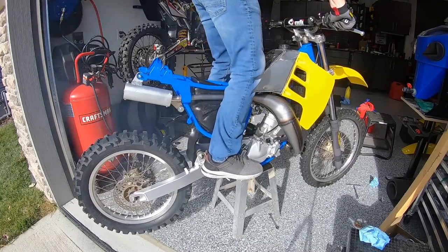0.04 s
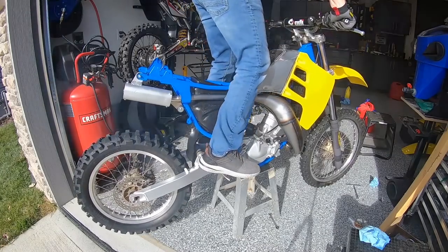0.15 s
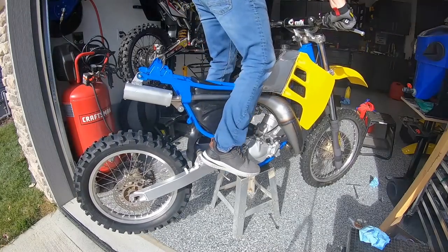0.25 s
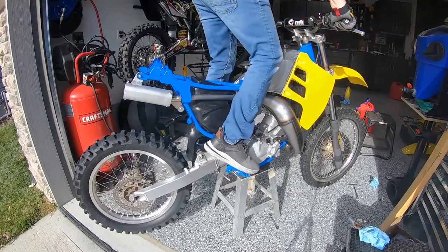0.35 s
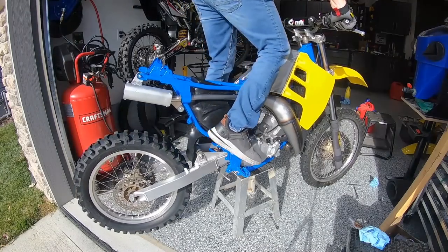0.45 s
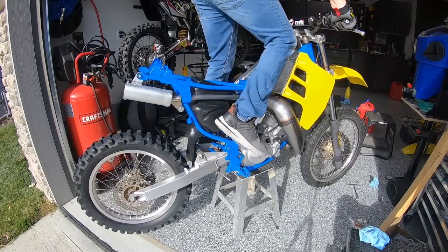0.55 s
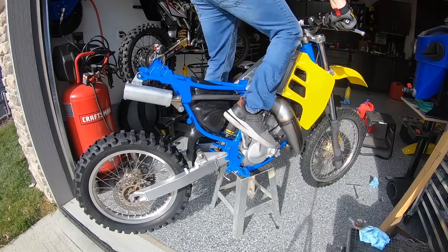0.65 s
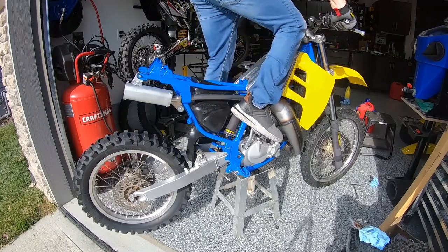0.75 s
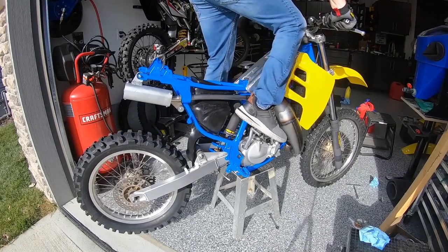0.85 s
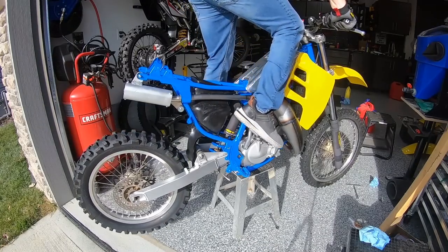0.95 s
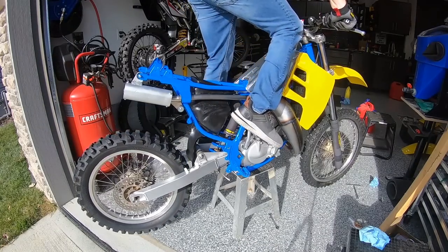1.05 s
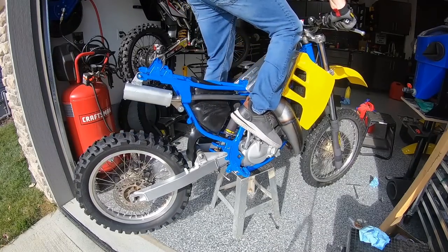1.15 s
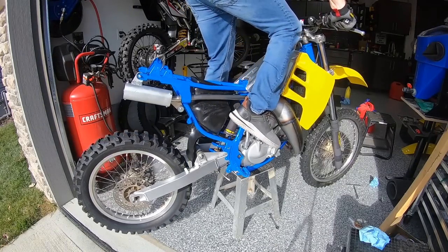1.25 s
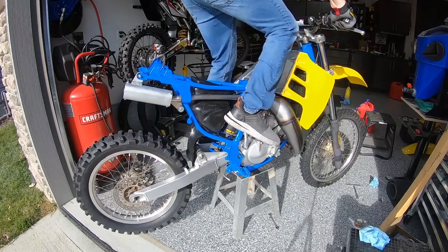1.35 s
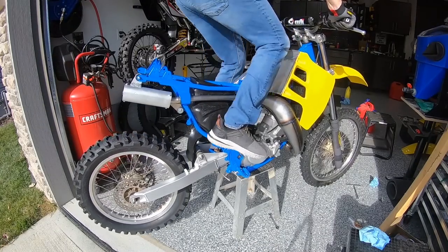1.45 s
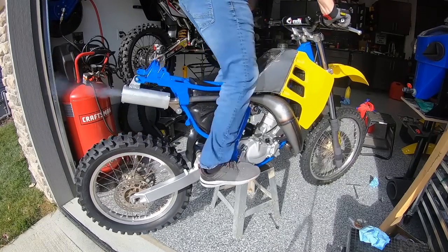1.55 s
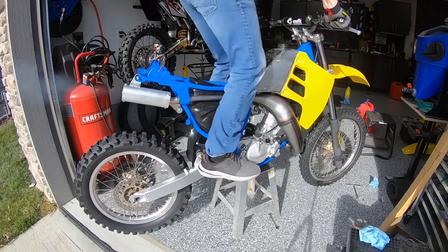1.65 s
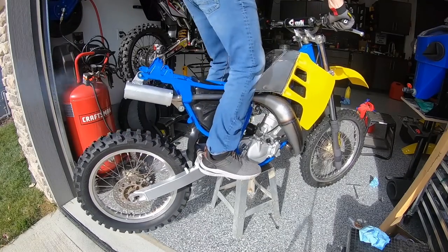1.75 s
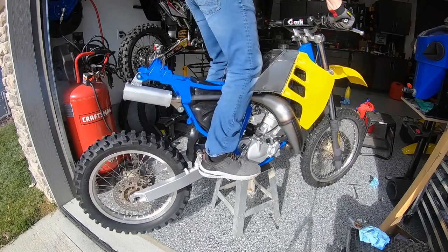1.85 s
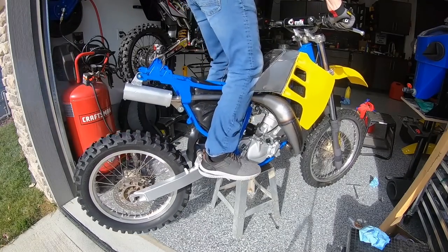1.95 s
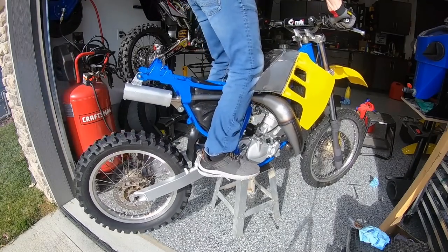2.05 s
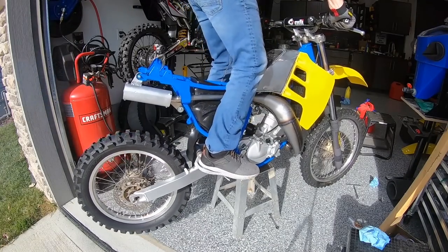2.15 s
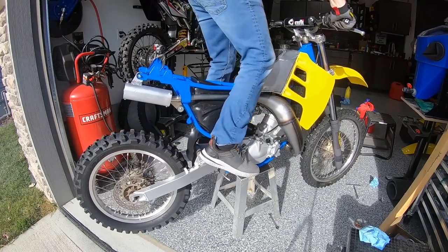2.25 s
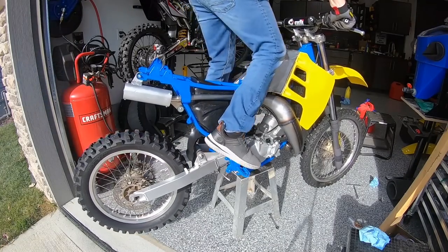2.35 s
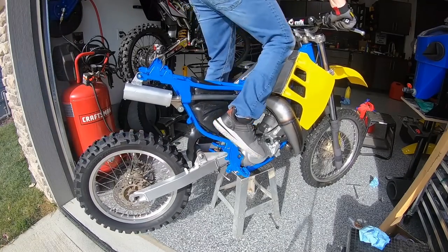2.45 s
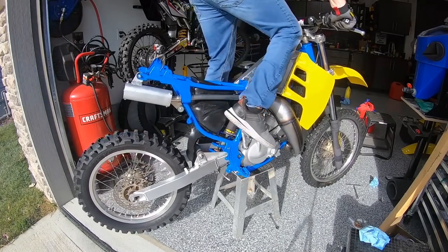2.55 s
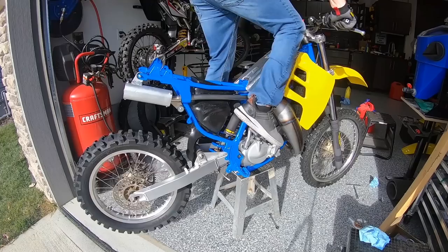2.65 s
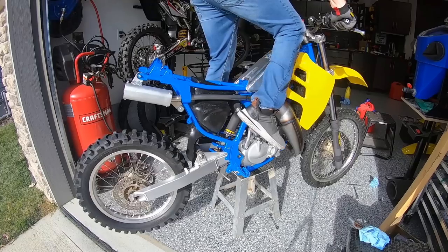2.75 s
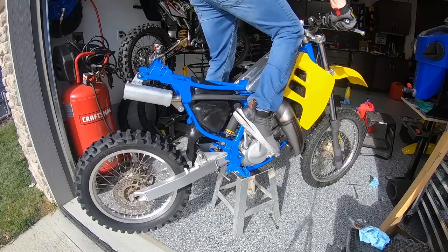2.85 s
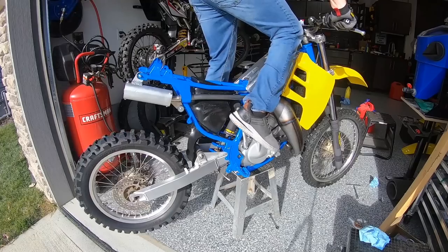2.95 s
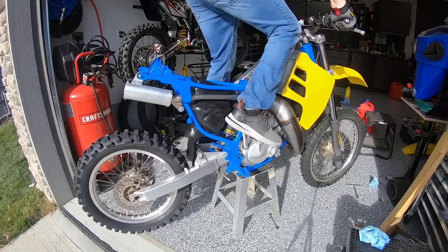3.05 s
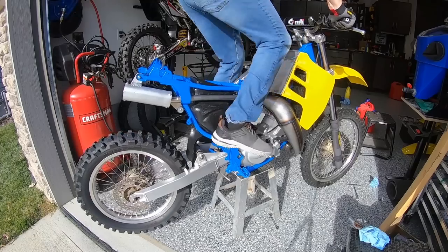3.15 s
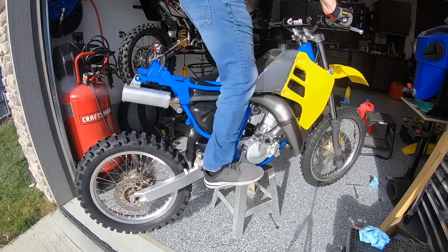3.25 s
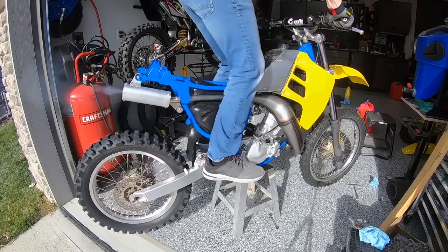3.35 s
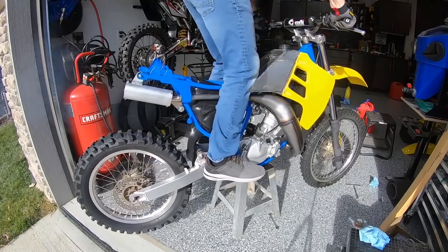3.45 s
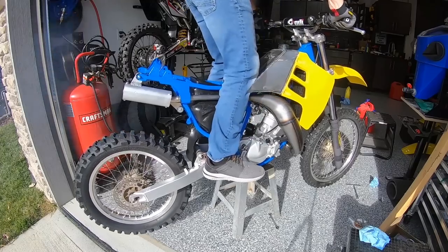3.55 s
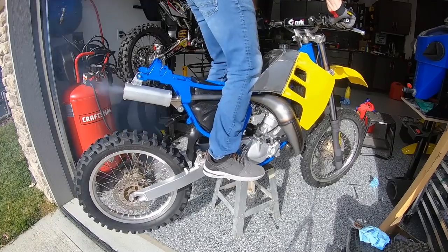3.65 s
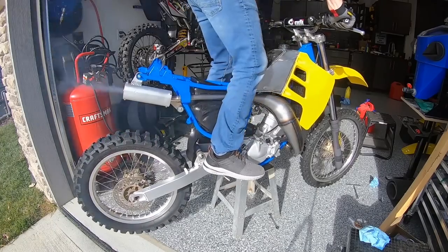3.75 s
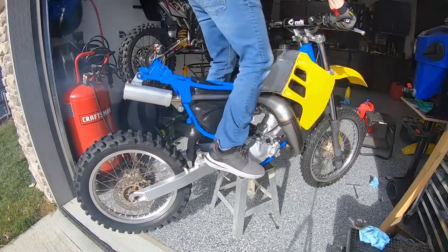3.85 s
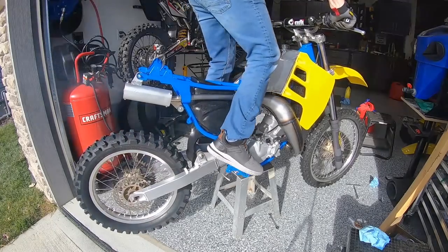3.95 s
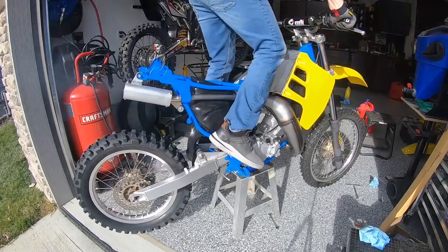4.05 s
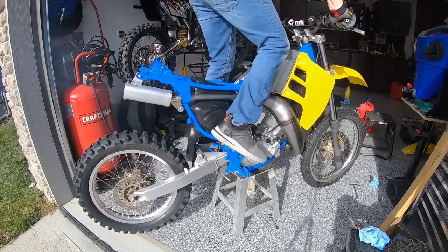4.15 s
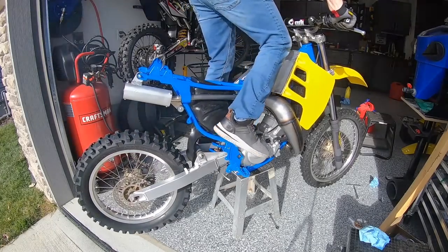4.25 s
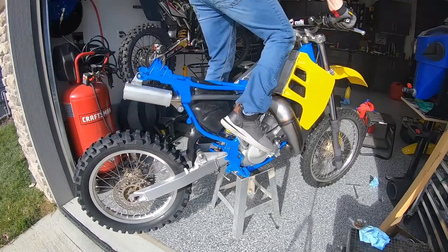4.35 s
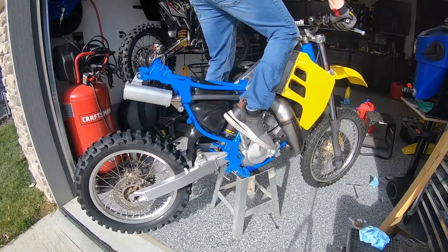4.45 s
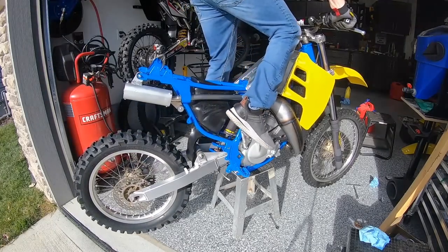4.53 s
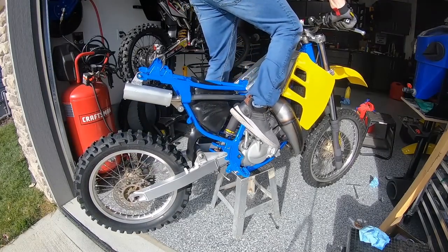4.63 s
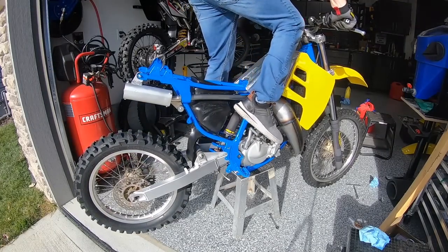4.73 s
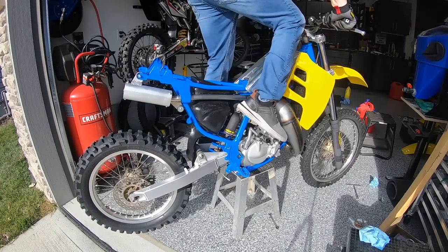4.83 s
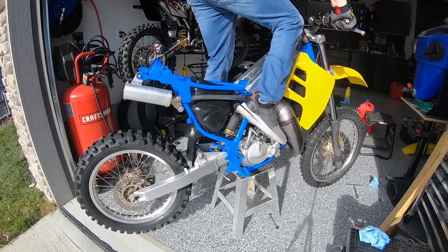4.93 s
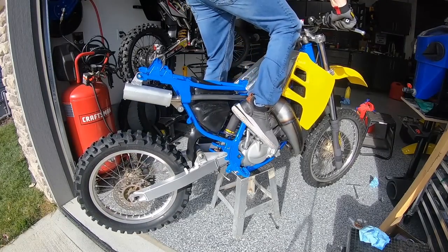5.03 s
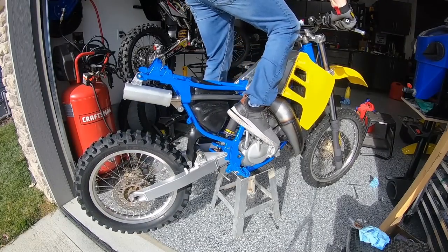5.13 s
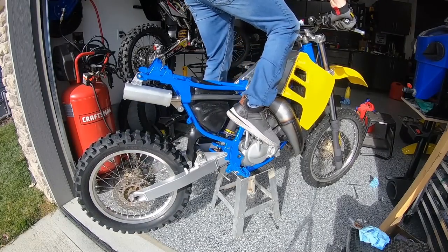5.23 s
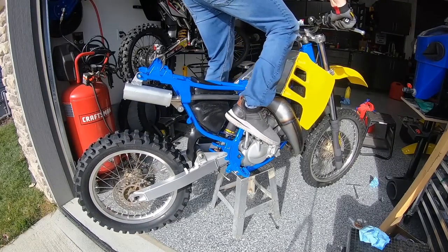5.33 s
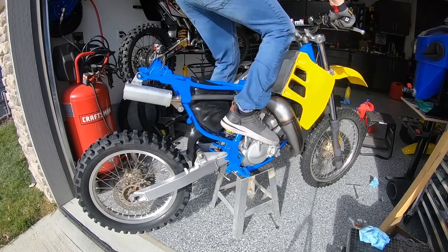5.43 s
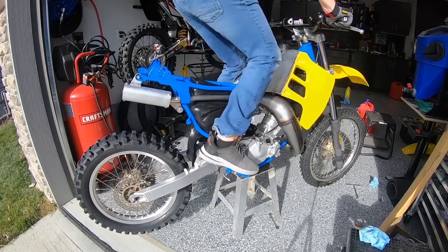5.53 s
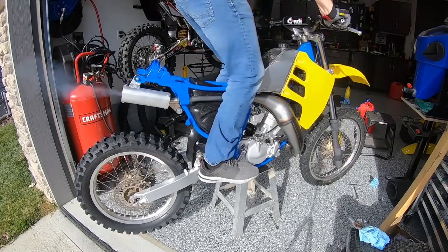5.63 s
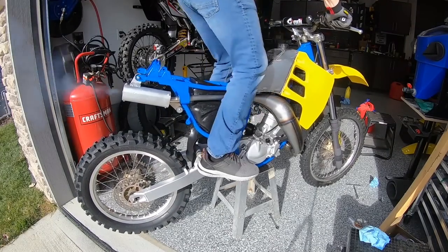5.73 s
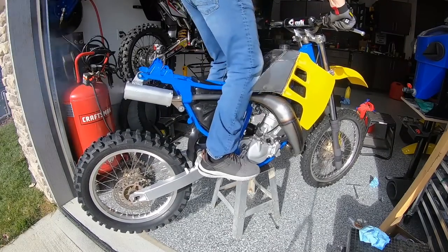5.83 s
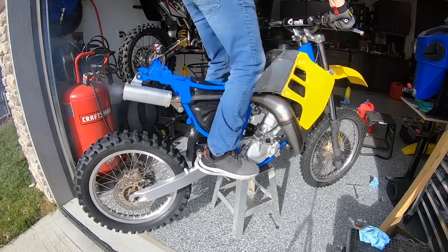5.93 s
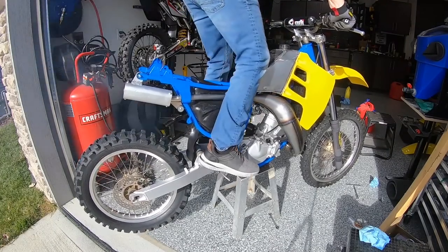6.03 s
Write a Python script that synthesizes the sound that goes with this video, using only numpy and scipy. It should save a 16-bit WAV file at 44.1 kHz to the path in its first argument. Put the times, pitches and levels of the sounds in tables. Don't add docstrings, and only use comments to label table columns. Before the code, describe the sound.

Kick-starting a reluctant dirt bike engine. Sharp ratchet clicks and fine ticks alternate with sudden bursts of loud, dull exhaust thumps, knocking metal and gear hiss. The first full attempt fades quickly, the next stumbles on for about a second, and the last is cut off while still turning. Faint pipe ringing fills the pauses. Heard close by at an open garage, with wind rumbling in the microphone.

```python
import sys
import numpy as np
from scipy import signal
from scipy.fft import rfft, irfft, next_fast_len
from scipy.io import wavfile
from scipy.ndimage import uniform_filter1d, map_coordinates

SR = 44100
rng = np.random.default_rng(int(sys.argv[2]) if len(sys.argv) > 2 else 0)


def voltage_ratio(decibels):
    exponent = np.asarray(decibels, float) / 20
    return 10 ** exponent


def output_pcm(signal):
    pcm = np.clip(np.atleast_2d(signal).T, -1, 1) * 32767
    wavfile.write(sys.argv[1], SR, np.round(pcm).astype(np.int16))


N = 268480

# start_s, buffet_db, left_minus_right_db
GUSTS = [(0, -29, 2), (.1, -33.5, 3.5), (1.49, -30.5, 0.5), (1.59, -29, -0.5), (2.31, -39, 5.5),
         (3.05, -36, 2), (3.29, -33.5, 5), (3.6, -32.5, 2), (4.4, -31, 10), (4.7, -33.5, 3),
         (4.9, -28.5, 3.5), (5.09, -40, 9), (5.13, -24, 6), (5.3, -26.5, 8.5), (5.6, -33, 18.5),
         (5.72, -25, 1), (6.0, -40.5, 8), (6.09, -27, -1)]
# freq_hz, density_db
RUMBLE_SPECTRUM = [(8.8, -44), (15, 22.5), (27, 4.5), (59, 4.5), (124, -3.5), (226, -16), (282, -24),
                   (341, -31.5), (500, -38), (650, -70), (1100, -120)]
# freq_hz, density_db
AIR_SPECTRUM = [(88, -31), (150, -13.5), (213, 2), (346, -1), (412, -8), (782, -11.5), (861, -16.5),
                (1270, -15), (2610, -29.5), (7160, -34), (15600, -44)]
# freq_hz, likeness [0-1]
PORT_LIKENESS = [(200, 1), (500, 0.99), (1000, 0.68), (2000, 0.72), (4000, 0.85), (8000, 0.34),
                 (12000, 0.13)]
# freq_hz, t60_s
GARAGE_DECAY = [(200, 0.42), (2000, 0.7), (6000, 0.4), (12000, 0.34)]
# peak_s, pitch_hz, peak_db, swell_db_per_s, fade_db_per_s
PIPE_TONES = [
    (.62, 1270, -57, 11, 144),
    (.75, 1300, -56.5, 150, 14),
    (2.95, 1302, -51, 36, 36),
    (4.75, 1310, -60, 55, 27),
    (2.1, 2030, -58, 100, 15),
    (4.2, 1963, -52, 103, 32),
]
# start_s, pitch_hz, level_db, t60_s, width_hz
LOOSE_PARTS = [
    (.004, 1480, -27, .15, 120),
    (1.572, 10600, -38, .1, 500),
    (3.26, 2950, -33, .25, 120),
    (3.295, 10500, -42, .1, 500),
    (2.365, 2250, -47, .1, 150),
    (4.36, 3060, -52, .8, 200),
    (4.79, 1980, -50, .4, 30),
    (5.147, 2050, -48, .15, 80),
]
# start_s, peak_db, lever_ring_db, spring_ring_db
RATCHET_CLICKS = [(0.4285, -32.5, -60, -46), (0.475, -24, -37, -48), (0.515, -34, -31, -36),
                  (0.5866, -23, -27, -30), (0.7006, -19.5, -37, -38), (0.813, -22.5, -22, -16),
                  (1.3478, -45, -50, -19.5), (2.408, -24, -28, -50), (2.4952, -23, -21.5, -53),
                  (2.5811, -22.5, -20, -52), (2.677, -22, -48, -43), (2.804, -33.5, -67.5, -27),
                  (4.7845, -24, -35, -21), (5.0245, -36, -60, -62), (5.1465, -40, -52, -38)]
# freq_hz, width_hz, level_db
LEVER_MODES = [(3705, 110, 0)]
# freq_hz, width_hz, level_db
SPRING_MODES = [(5780, 420, 11), (6800, 870, 10)]
# start_s, peak_db, edge_db
PAWL_TICKS = [(0.034, -17.5, -10.5), (0.0657, -20.5, -4.5), (0.102, -17, -14), (1.3477, -36.5, 4),
              (1.401, -30, -8), (2.0134, -34.5, 3), (2.1, -35.5, 1), (2.138, -39, -2), (4.7312, -31, -31),
              (4.7717, -40, -20), (4.889, -44, -23), (5.389, -54.5, -4), (1.092, -56, -2), (1.169, -51, -8),
              (5.144, -39, 1), (2.0442, -13.5, -20), (2.2116, -36.5, -3), (2.238, -26.5, -15.5),
              (2.273, -33, -5.5), (2.309, -30, -10), (3.0714, -45.5, -4.5), (3.1437, -36, -19),
              (4.254, -37.5, 4), (4.397, -46, 5.5), (4.458, -33, -9.5), (4.479, -30.5, -15),
              (4.508, -38, -1), (4.5364, -31, -10.5), (4.58, -32.5, -10), (4.6224, -32, -12),
              (4.676, -36.5, -26)]
# start_s, peak_db, edge_db
DULL_KNOCKS = [(1.0118, -43, -23), (1.031, -38.5, -33), (1.506, -37, -14), (1.535, -25, -15),
               (1.5714, -18, -25), (1.675, -39, -21), (3.256, -27, -20), (3.306, -20.5, -23),
               (3.723, -20.5, -13), (3.825, -16.5, -13), (4.001, -30, -21), (4.16, -33, -17),
               (5.519, -43.5, -27), (5.566, -43, -25), (1.6306, -15.5, -15), (1.703, -15.5, -16),
               (1.792, -16.5, -17), (2.9145, -43, -33), (2.947, -37.5, -45), (3.1875, -39, -25),
               (3.222, -34, -16), (3.3258, -18.5, -4.5), (3.3776, -15.5, -14.5), (3.444, -15.5, -12),
               (3.917, -19.5, -9.5), (4.068, -17, -9), (4.222, -23, -25), (4.287, -25, -7.5),
               (5.118, -41, -35), (5.459, -43.5, -18), (5.503, -41, -10), (5.5553, -51, -28),
               (5.594, -34, -20), (5.6064, -30, -10), (5.622, -25.5, -16), (5.669, -13, -15.5),
               (5.731, -18.5, -9), (5.7838, -19, -30), (5.828, -17, -25), (6.048, -21.5, -26)]
# start_s, peak_db
SKIPPED_TEETH = [(1.6681, -30), (1.8074, -16), (1.8544, -29), (1.8737, -30), (1.8934, -24), (1.9174, -30),
                 (1.936, -20), (1.959, -22.5), (1.9834, -25), (2.0847, -27), (2.117, -28), (2.161, -33),
                 (2.1859, -31), (3.4254, -29), (3.503, -18), (3.5324, -22), (3.5524, -24), (3.5793, -19),
                 (3.601, -35), (3.6164, -18), (3.6366, -24), (3.6554, -28), (3.6785, -24), (3.6974, -36),
                 (3.7209, -34), (3.7633, -24), (3.7878, -27), (3.8114, -21), (3.8741, -37), (3.896, -30),
                 (3.957, -26), (3.9964, -23), (4.0178, -24), (4.0394, -24), (4.118, -22.5), (4.1405, -30),
                 (4.1644, -32), (4.1889, -26), (4.2163, -26), (4.3344, -43), (4.3534, -48), (4.372, -40),
                 (4.4149, -31), (4.4337, -35), (5.5822, -48), (5.656, -38), (5.7877, -25), (5.883, -27.5),
                 (5.9024, -25), (5.988, -22), (6.0107, -28)]
# freq_hz, density_db
SNAP_SPECTRUM = [(290, -17), (500, 7), (1310, -4), (1650, -6.5), (1800, -6), (2400, -10.5), (3750, -7.5),
                 (3970, -7), (9410, -8), (11200, -22), (15600, -23)]
# start_s, case_clatter_db
SPINS = [
    [(0, -28.5), (.13, -42), (.22, -52.5), (.4, -69.5)],
    [(1.45, -53.5), (1.53, -38), (1.58, -33), (1.72, -31.5), (1.87, -31), (2.0, -34.5), (2.1, -45),
     (2.23, -50), (2.45, -71.5)],
    [(3.1, -67.5), (3.19, -54.5), (3.26, -33), (3.42, -33), (3.52, -30.5), (3.96, -33.5), (4.13, -34),
     (4.32, -42), (4.75, -76.5)],
    [(5.45, -68.5), (5.55, -50.5), (5.62, -34.5), (5.655, -34), (5.69, -34), (5.8, -33), (5.87, -32.5),
     (5.95, -26), (6.09, -30)],
]
COAST_LOSS = [4.3, 1.06, 0.99, 0.85]
# freq_hz, width_hz, level_db
EXHAUST_MODES = [(152, 66, -6), (220, 51, -1.5), (261, 14, 3.5), (320, 57, -14), (421, 220, -14),
                 (529.7, 63, -7), (794, 15, -26)]
# freq_hz, width_hz, level_db
CASE_MODES = [(680, 39, -13), (1044, 36, 9.5), (1355, 44, 5.5), (1960, 53, 7.5), (2560, 8.1, 1.5),
              (3010, 61, 5), (3680, 32, 2), (3915, 140, 4)]
# freq_hz, density_db
CLATTER_SPECTRUM = [(210, -22), (350, 1.5), (437, -6), (528, -28), (584, -6), (1330, -14), (1500, -14.5),
                    (3060, -9.5), (5000, -21.5), (6500, -24), (11000, -120)]
# freq_hz, density_db
HISS_SPECTRUM = [(2350, -24.5), (4000, -8.5), (4560, -6), (5990, -8.5), (6980, -4), (9120, -8),
                 (11600, -24), (14500, -30), (15600, -44)]
# start_s, thump_peak_db, pipe_pitch_hz
KICKED_POPS = [(1.298, -30, 248.4), (1.34, -30, 246.5), (1.374, -34, 244), (1.411, -33.5, 258),
               (1.563, -4, 244), (1.587, -10.5, 247.4), (1.601, -2.5, 261), (1.64, -1.5, 231.4),
               (1.676, -5, 260.3), (1.714, -5, 270.5), (3.255, -35, 288), (3.275, -2.5, 251.3),
               (3.316, 0, 227.4), (3.352, -4, 226), (3.388, -3, 247.5), (3.417, -24, 254),
               (3.444, -9.5, 270.6), (5.626, -8.5, 229), (5.643, -4, 261), (5.68, -2.5, 261),
               (5.706, -2.5, 246.4), (5.737, -5, 268), (5.764, -4.5, 239.3), (5.787, -15, 259),
               (5.806, -10.5, 266)]
# start_s, thump_peak_db, pipe_pitch_hz
CAUGHT_FIRINGS = [(0.01, -23, 250), (0.067, -41, 240), (0.163, -25.5, 232), (1.804, -13, 254.4),
                  (1.919, -35, 230), (1.971, -24, 225), (2.027, -15.5, 248.7), (2.128, -14.5, 241.5),
                  (3.528, -49, 257), (3.693, -18, 250), (3.737, -8.5, 261.5), (3.781, -12.5, 235),
                  (3.828, -7.5, 259), (3.878, -11.5, 254.5), (3.923, -10.5, 270), (3.97, -14, 265.7),
                  (4.015, -14, 240), (4.07, -11, 261), (4.122, -15.5, 234.5), (4.18, -17.5, 279),
                  (4.253, -16, 246.5), (4.353, -15.5, 246), (5.848, -14.5, 292.4), (5.877, -20, 250),
                  (5.914, -24, 264), (5.954, -14, 293.4), (5.995, -32, 276), (6.045, -11.5, 229)]

TOOTH_ATTACK_S, TOOTH_T60_S = 0.0015, 0.075


def unit(x):
    return x / np.sqrt(np.mean(x ** 2) + 1e-20)


def along(points, hz):
    f, v = np.transpose(points)
    return np.interp(np.log(hz + 1), np.log(f + 1), v)


def curves(rows, silent=None):
    s, *columns = np.transpose(rows)
    return np.array([np.interp(np.arange(N) / SR, s, c, silent, silent) for c in columns])


def wobble(rate):
    knots = rng.standard_normal(int(N * rate / SR) + 4)
    return map_coordinates(knots, [np.arange(N) * rate / SR])


def filtered(x, response):
    m = next_fast_len(N + SR // 2)
    return irfft(rfft(x, m) * response(np.fft.rfftfreq(m, 1 / SR)), m)[..., :N]


def modes(table):
    def response(f):
        return sum((-1) ** k * voltage_ratio(db) * 1j * f * width / (hz * hz - f * f + 1j * f * width)
                   for k, (hz, width, db) in enumerate(table))
    return response


def twice_through(x, table):
    return unit(filtered(filtered(x, modes(table)), modes(table)))


def coloured(spectrum, channels=1):
    return unit(filtered(rng.standard_normal((channels, N)), lambda hz: voltage_ratio(along(spectrum, hz))))


def bursts(times, levels_db, attack, t60):
    strikes, t = np.zeros(N), np.arange(SR // 2) / SR
    np.add.at(strikes, np.round(np.asarray(times) * SR).astype(int), voltage_ratio(levels_db))
    return signal.fftconvolve(strikes, (1 - np.exp(-t / attack)) * voltage_ratio(-60 * t / t60))[:N]


def patchy(x, depth_db):
    z = signal.stft(x, nperseg=256)[2]
    field = uniform_filter1d(rng.standard_normal(z.shape), size=3, axis=0)
    field = uniform_filter1d(field, size=10, axis=1)
    return signal.istft(z * voltage_ratio(depth_db * unit(field)), nperseg=256)[1][:N]


def spread(x):
    def turn(hz):
        return np.arccos(np.clip(along(PORT_LIKENESS, hz), -1, 1)) / 2
    z = signal.stft(x, nperseg=256)[2]
    paths = uniform_filter1d(rng.standard_normal((2, *z.shape)), size=3, axis=1)
    paths = uniform_filter1d(paths, size=5, axis=2)
    other = signal.istft(z * np.exp(1j * np.arctan2(*paths)), nperseg=256)[1][:N]
    mid = filtered(x, lambda f: np.cos(turn(f)))
    side = voltage_ratio(3.5) * filtered(other, lambda f: np.sin(turn(f)))
    return np.array([mid + side, mid - side]) * voltage_ratio([[-0.3], [0.3]])


def wind():
    buffet_db, pan_db = curves(GUSTS)
    bright_db = np.minimum(-15.5 + 7.5 * pan_db, 10.5)
    flutter_db = 2.0 * np.array([wobble(16), wobble(6.4)])
    shared, split = coloured(RUMBLE_SPECTRUM, channels=2) * voltage_ratio(flutter_db)
    ports = unit(np.array([shared + 0.47 * split, shared - 0.51 * split]))
    treble = filtered(ports, lambda f: f ** 2 / (f ** 2 + 110 ** 2))
    ports = ports + (voltage_ratio(bright_db) - 1) * treble
    air = voltage_ratio(-50.5 + 0.26 * wobble(2.65)) * coloured(AIR_SPECTRUM)[0]
    return voltage_ratio(buffet_db - 1.5 + np.array([pan_db, -pan_db]) / 2) * ports + spread(air)


def garage(x):
    out, step = np.zeros(N + 2 * SR), SR // 3
    for at in range(0, N, step):
        hz, t, z = signal.stft(rng.standard_normal(SR // 2), SR, nperseg=256)
        decay = voltage_ratio(-60 * t / along(GARAGE_DECAY, hz)[:, None])
        tail = signal.istft(z * decay, SR, nperseg=256)[1]
        wet = signal.fftconvolve(x[at:at + step], tail / np.linalg.norm(tail))
        out[at + SR // 90:][:len(wet)] += wet
    return out[:N]


def pipe_song():
    out, t = np.zeros(N), np.arange(N) / SR
    for s, hz, peak_db, swell, fade in PIPE_TONES:
        db = peak_db - np.maximum(swell * (s - t), fade * (t - s))
        level = np.sqrt(2) * voltage_ratio(db + 1.8 * wobble(25.58))
        phase = 2 * np.pi * np.cumsum(hz * (1 + 0.0028 * wobble(25.2))) / SR
        out += level * np.sin(phase)
    return out


def pings():
    out, t = np.zeros(N + SR), np.arange(SR // 2) / SR
    for at, hz, db, t60, width_hz in LOOSE_PARTS:
        wander = np.cumsum(rng.standard_normal(len(t))) * np.sqrt(2 * np.pi * width_hz / SR)
        envelope = np.sqrt(2) * voltage_ratio(db - 60 * t / t60) * (1 - np.exp(-t / 0.00058))
        out[round(at * SR):][:len(t)] += envelope * np.sin(2 * np.pi * hz * t + wander)
    return out[:N]


def rings():
    s, _, lever_db, spring_db = np.transpose(RATCHET_CLICKS)
    out = twice_through(rng.standard_normal(N), LEVER_MODES) * bursts(s, lever_db - 10, attack=0.001, t60=0.09)
    spring = twice_through(rng.standard_normal(N), SPRING_MODES)
    return out + spring * bursts(s, spring_db - 22, attack=0.001, t60=0.29)


def drag():
    start_s, end_s, attack_s = 1.18, 1.57, 0.12
    t = np.arange(N) / SR - start_s
    pull = np.clip(t / attack_s, 0, 1) ** 2 * (t < end_s - start_s)
    catch_db = -5.1 * np.exp(-((t - 0.265) / 0.0095) ** 2)
    rasp_level = pull * voltage_ratio(-40.5 - 20 * t + catch_db)
    rough = patchy(rng.standard_normal(N) * voltage_ratio(2.2 * wobble(25)), depth_db=3.5)
    groan = unit(filtered(filtered(rough, modes([(530, 200, 0)])), modes([(486, 290, 0)])))
    rasp = unit(filtered(filtered(rough, modes([(2700, 1060, 0)])), modes([(2700, 1400, 0)])))
    scrape = unit(filtered(rough, lambda f: modes([(7000, 4500, 0)])(f) / (1 + (f / 9800) ** 12)))
    return pull * voltage_ratio(-51) * groan + rasp_level * rasp + pull * voltage_ratio(-47.5) * scrape


def teeth():
    s, peak_db = np.transpose(SKIPPED_TEETH)
    colour = coloured(HISS_SPECTRUM)[0] + coloured(CLATTER_SPECTRUM)[0]
    return patchy(colour, depth_db=4.0) * bursts(s, peak_db - 12, attack=TOOTH_ATTACK_S, t60=TOOTH_T60_S)


def contacts():
    clicks = [(s, db, -11, -12.5) for s, db, *_ in RATCHET_CLICKS]
    return clicks + [(s, db, -0.5, edge_db) for s, db, edge_db in DULL_KNOCKS]


def lever():
    s, peak_db, low_db, edge_db = np.transpose(contacts())
    snap = coloured(SNAP_SPECTRUM)[0] * voltage_ratio(1.2 * wobble(300))
    snap = patchy(snap, depth_db=3.5)

    def above_corner(f, hz):
        return 1 / (1 + (hz / (f + 1)) ** 8)

    def band(low_hz, high_hz):
        return unit(filtered(snap, lambda f: above_corner(f, low_hz) - above_corner(f, high_hz)))

    low, mid, high = band(650, 2620), band(1900, 3930), band(5200, 9200)
    high = high + 0.047 * unit(filtered(snap, lambda f: above_corner(f, 11000)))
    clicks = len(RATCHET_CLICKS)
    knock_s, knock_db = s[clicks:], peak_db[clicks:]
    out = low * bursts(s, peak_db + low_db, attack=0.0065, t60=0.095)
    out += mid * bursts(s[:clicks], peak_db[:clicks] - 8.5, attack=0.0013, t60=0.073)
    out += mid * bursts(knock_s, knock_db - 7, attack=0.00051, t60=0.04)
    out += high * bursts(s, peak_db + edge_db + 3, attack=0.0019, t60=0.082)
    out += (low + 0.26 * mid) * bursts(knock_s, knock_db - 8, attack=0.0003, t60=0.016)
    s, peak_db, edge_db = np.transpose(PAWL_TICKS)
    out += mid * bursts(s, peak_db - 8, attack=0.00087, t60=0.05)
    out += high * bursts(s, peak_db + edge_db + 1, attack=0.00042, t60=0.051)
    return out


def skipping():
    s = np.array([row[0] for row in SKIPPED_TEETH + PAWL_TICKS])
    between_teeth = 0.22
    gate = between_teeth + bursts(s, 0 * s, attack=TOOTH_ATTACK_S, t60=TOOTH_T60_S)
    return gate / np.sqrt(uniform_filter1d(gate ** 2, size=SR // 20))


def turning():
    full_spin_db, crank_per_s, mesh_per_s = -30, 18, 110
    clatter = sum(voltage_ratio(curves(part, silent=-120)[0]) for part in SPINS)
    spin_db = 20 * np.log10(clatter) - full_spin_db
    s, pop_db, _ = np.transpose(KICKED_POPS)
    drone = voltage_ratio(-29 + 0.96 * spin_db) + bursts(s, pop_db - 20.5, attack=0.026, t60=0.3)

    lag = round(0.1 * SR)
    late_db = uniform_filter1d(np.clip(spin_db, -45, 0), size=lag, origin=(lag - 1) // 2, mode="nearest")
    kick = np.searchsorted([part[0][0] for part in SPINS[1:]], np.arange(N) / SR)
    hiss = voltage_ratio(-33.5 + np.take(COAST_LOSS, kick) * np.minimum(spin_db, late_db))

    speed = voltage_ratio(0.17 * spin_db)
    turn = np.cumsum(crank_per_s * speed * (1 + 0.15 * wobble(9.1))) / SR
    pipe_beat = voltage_ratio(1.5 * np.cos(2 * np.pi * turn) + 1.23 * wobble(60))
    case_beat = voltage_ratio(1.23 * wobble(60))
    grit = voltage_ratio(0.79 * wobble(900))
    mesh = np.cumsum(mesh_per_s * speed * voltage_ratio(4 * wobble(70))) / SR
    chatter = 1 + np.sin(np.pi * mesh) ** 2 * voltage_ratio(2.5 * wobble(90))
    skips = skipping()

    pumping = unit(filtered(rng.standard_normal(N) * pipe_beat, modes(EXHAUST_MODES)))
    plain = coloured(CLATTER_SPECTRUM)[0]
    case = patchy(0.79 * plain + 0.69 * unit(filtered(plain, modes(CASE_MODES))), depth_db=2.0)
    case = unit(case * case_beat * grit * chatter * np.sqrt(skips))
    gears = unit(patchy(coloured(HISS_SPECTRUM)[0], depth_db=2.0) * grit * skips)
    return drone * pumping + clatter * voltage_ratio(2.0) * case + hiss * gears


def exhaust():
    s, thump_db, slug_hz = np.transpose(KICKED_POPS + CAUGHT_FIRINGS)
    out, t = np.zeros(N + SR), np.arange(SR // 5) / SR

    def lobe(u):
        return np.clip(u, 0, 1) / np.cosh(2.3 * (u - 1.5))

    scatter = rng.standard_normal((len(s), 5))
    crack_db = np.repeat([-26, -22], [len(KICKED_POPS), len(CAUGHT_FIRINGS)])
    crack_db = crack_db + 0.61 * thump_db + 3.5 * scatter[:, -1]
    chamber_rise_fall = (1 - np.exp(-(t / 0.016) ** 2)) * voltage_ratio(-60 * t / 0.22)
    for at, db, hz, z in zip(s, thump_db, slug_hz, scatter):
        phase = 2 * np.pi * hz * t
        tone = np.sin(phase) + 0.21 * np.sin(1.463 * phase + z[0])
        tone += 0.12 * np.sin(2 * phase + z[3]) + 0.066 * np.sin(2.9 * phase + z[1])
        slug = lobe(t / 0.011) * tone
        slug += 0.17 * lobe(t / 0.01) * np.sin(0.541 * phase + z[2])
        chamber = 0.13 * np.sin(2 * np.pi * 262 * t + z[1]) + 0.096 * np.sin(2 * np.pi * 523 * t + z[0])
        slug += chamber_rise_fall * chamber
        echoes = np.zeros(len(t))
        for k in range(4):
            echo_level = voltage_ratio(-8.0 - 3.9 * k + 2 * z[1 + k % 2]) * (-1) ** (k + 1)
            echoes += echo_level * lobe((t - (k + 1) * 0.02035 - 0.001) / 0.0086)
        thump = voltage_ratio(db - 1.5) * (slug + echoes * np.sin(phase + 0.5 * z[2]))
        out[max(round((at - 0.0118) * SR), 0):][:len(t)] += thump
    crack = bursts(s - 0.002, crack_db, attack=0.0027, t60=0.069)
    return out[:N] + crack * coloured(CLATTER_SPECTRUM)[0] * voltage_ratio(2.1 * wobble(250))


def scene():
    engine = exhaust() + turning()
    metal = lever() + teeth() + drag() + pings()
    room = garage(voltage_ratio(-10.5) * engine + voltage_ratio(-11) * metal)
    bike = engine + metal + room + pipe_song() + rings()
    return spread(bike) + wind()


def low_pass(x):
    return signal.sosfilt(signal.butter(12, 15710, fs=SR, output="sos"), x)


def record(dry):
    limited = dry / (1 + np.abs(dry / 0.95) ** 5) ** (1 / 5)
    mix = filtered(limited, lambda f: f < 15750)
    return low_pass(mix)


dry = scene()
out = record(dry)
output_pcm(out)
```